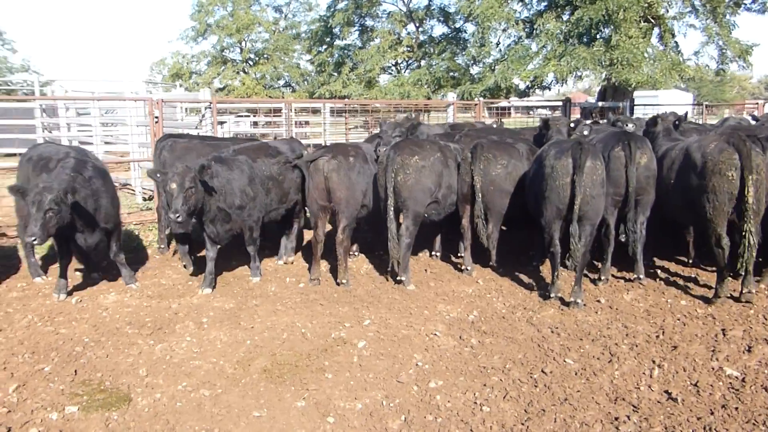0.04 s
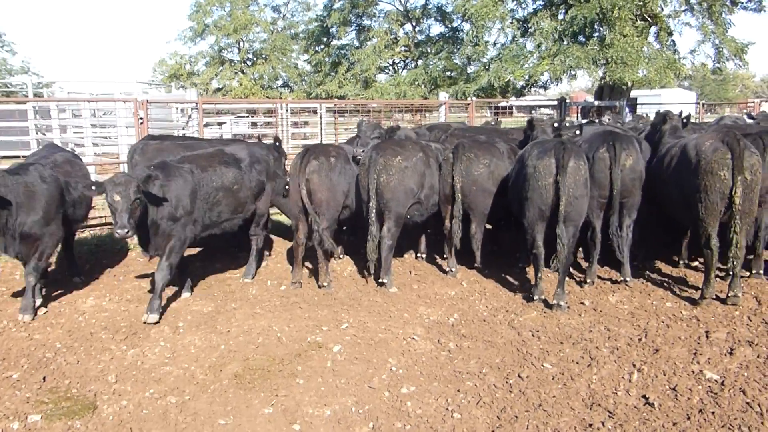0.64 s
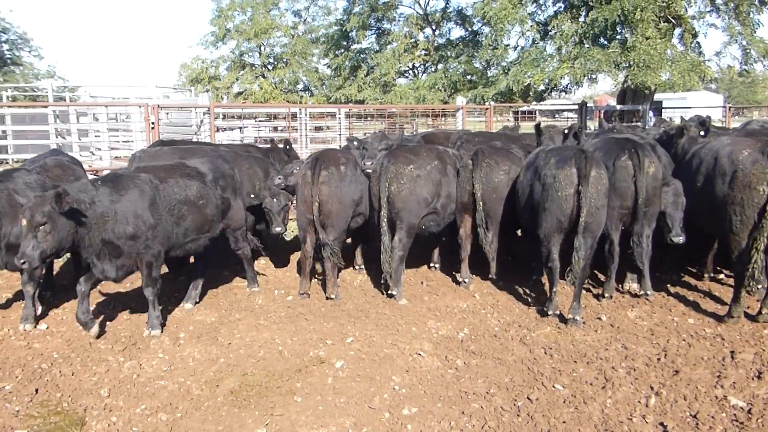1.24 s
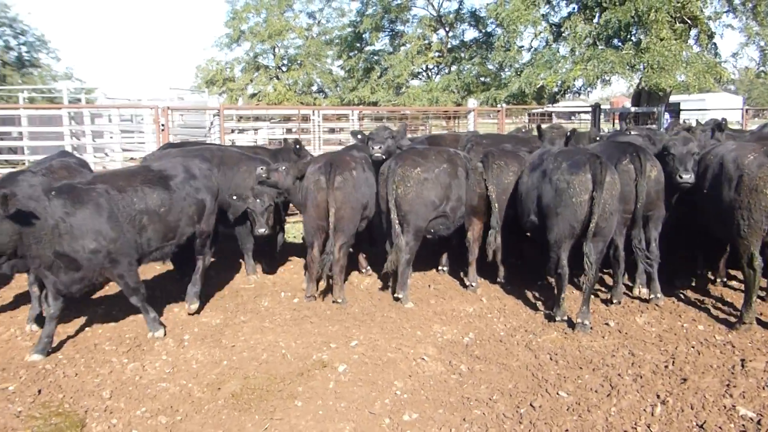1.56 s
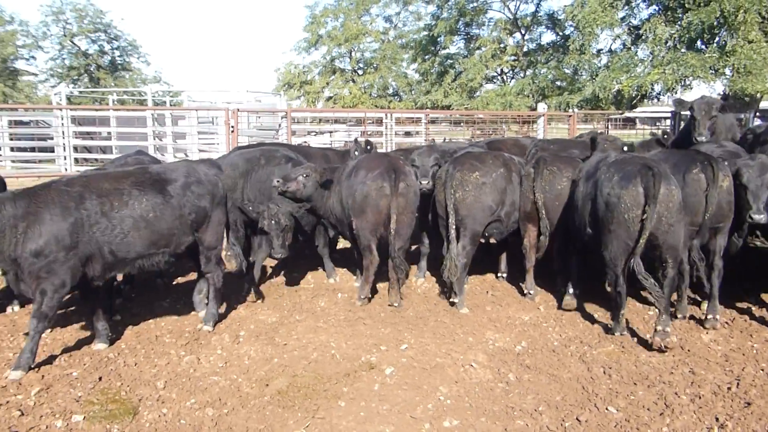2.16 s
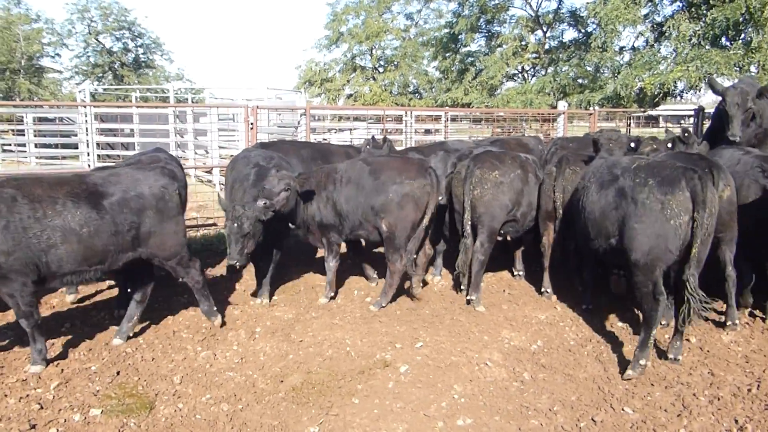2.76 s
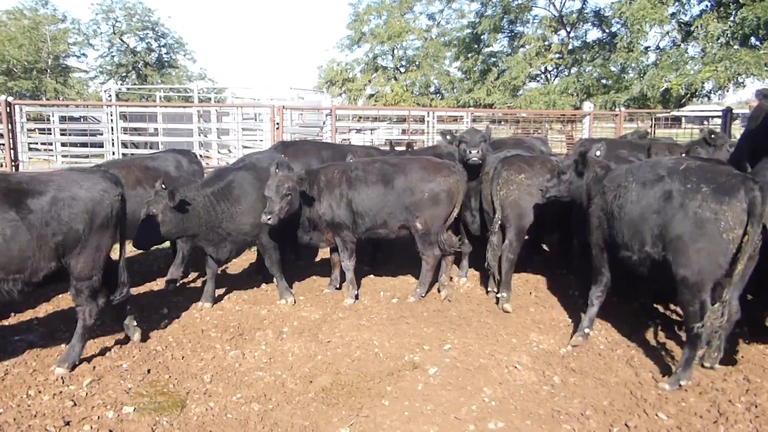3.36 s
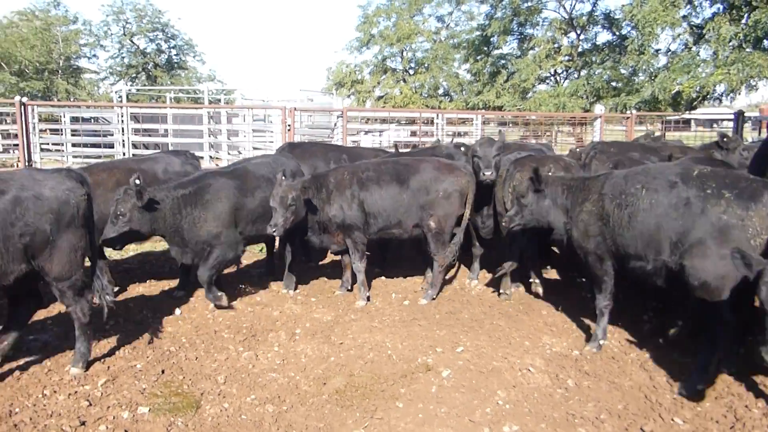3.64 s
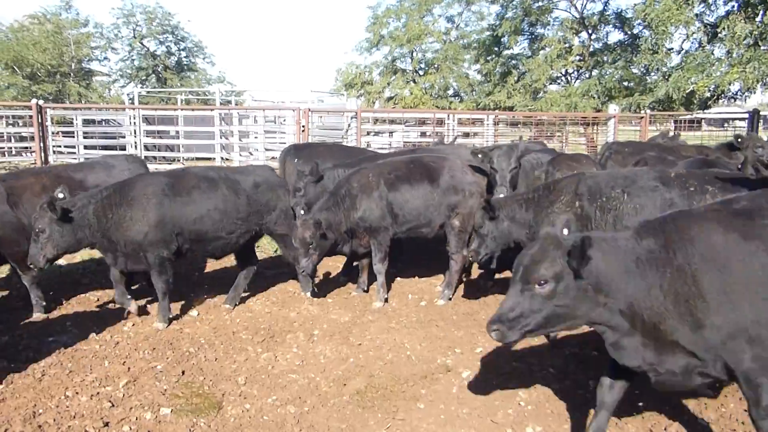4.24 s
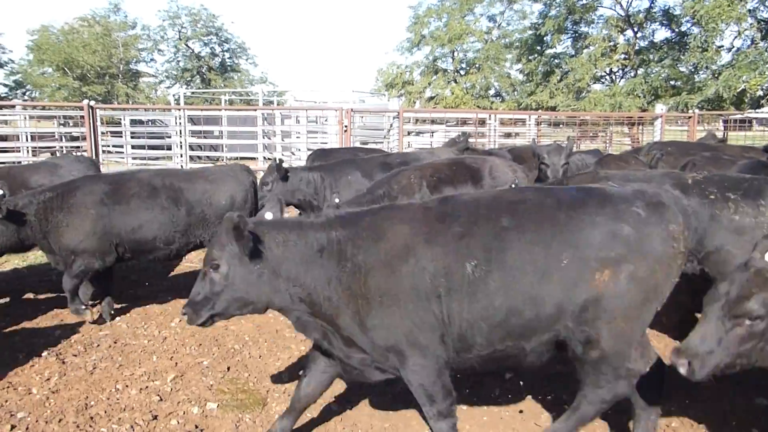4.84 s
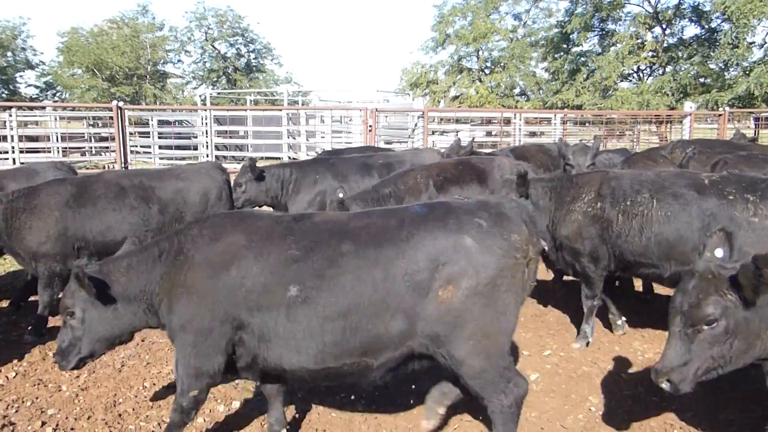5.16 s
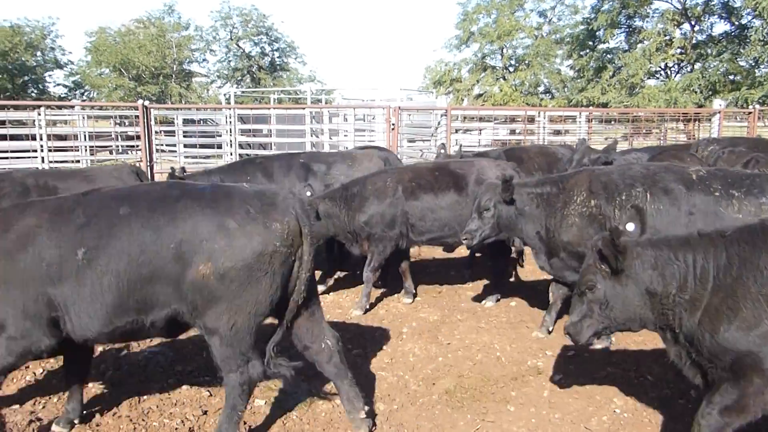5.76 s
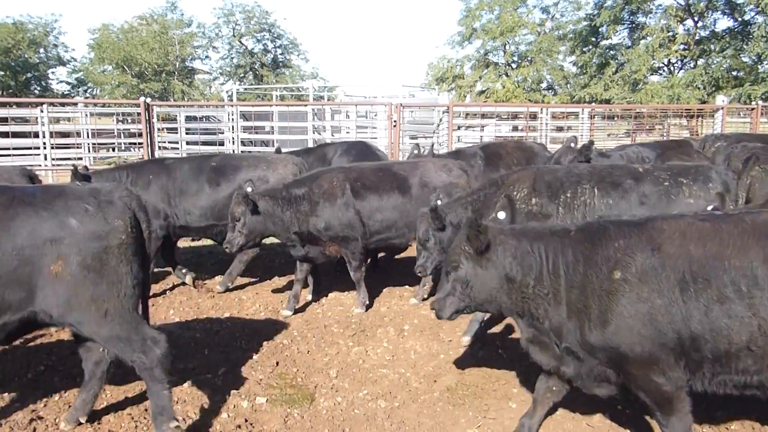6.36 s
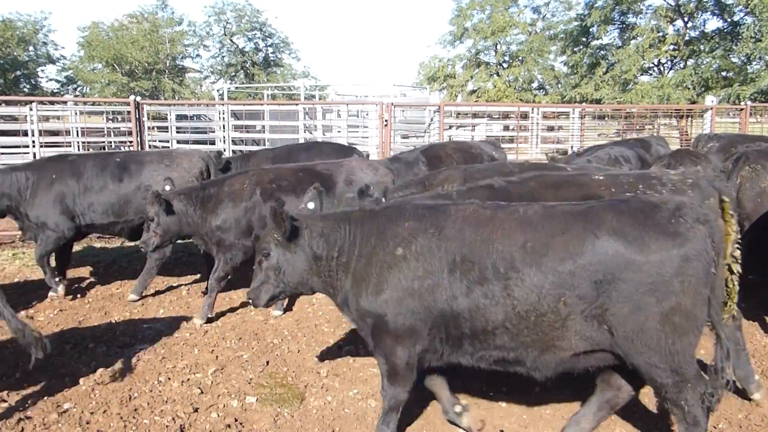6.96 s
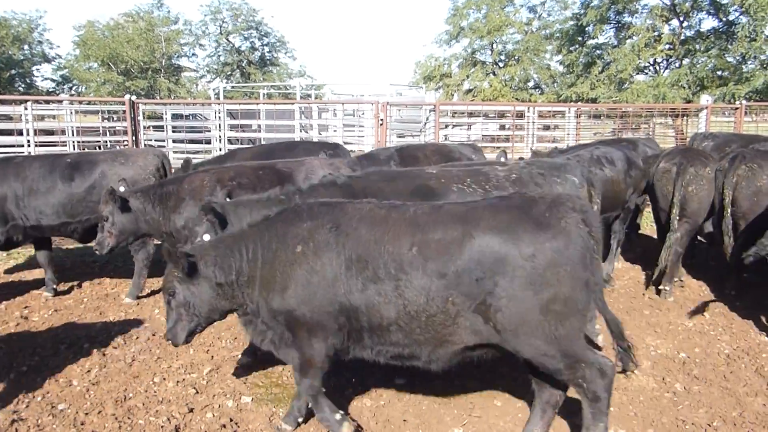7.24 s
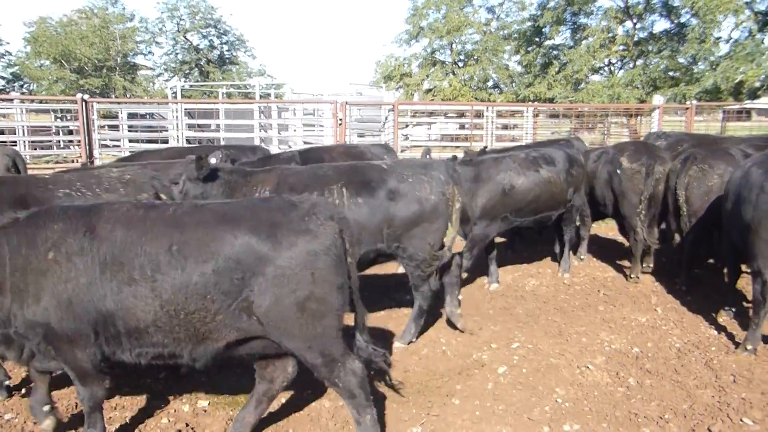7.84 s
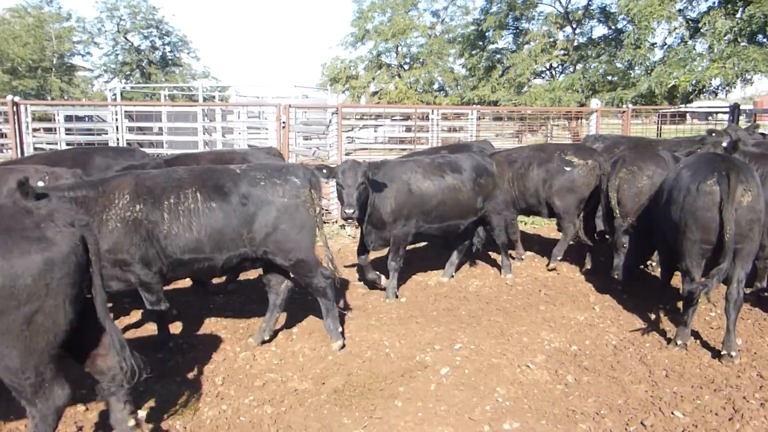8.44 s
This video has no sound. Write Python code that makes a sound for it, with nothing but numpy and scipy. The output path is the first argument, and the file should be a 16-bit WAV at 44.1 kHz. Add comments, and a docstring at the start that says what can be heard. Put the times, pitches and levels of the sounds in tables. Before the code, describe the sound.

Throughout, a herd of cattle shuffles about a dry dirt pen in quiet open air, its many footfalls merging into soft, dull trampling and crackling grit. Almost at once, nearer hooves are heard close by, scuffing through grit, flicking small stones and thudding unevenly on packed ground. These steps grow louder and busier from about 3 to 5.5 seconds, with a sharp stone click near 3.7 seconds. At about 5.7 seconds a short, low, rising growl breaks into a high, held, nasal moo that turns raspy and ends at 6.5 seconds. The hoof steps carry on. Two faint, short, falling whistles, like a far bird, come at about 7.3 and 7.7 seconds. Right after them a second growl rises into another moo, which lasts until the end at about 8.5 seconds, over more close thuds. The calls and steps have only a slight, short echo.

```python
"""A herd shuffles about a dry dirt pen in quiet open air, its many footfalls merging into noise.
Almost at once two of the cattle are heard passing close by: hooves scuff through grit, flick stones
and thud on packed ground. Near 5.7 s a low, rising growl breaks into a high, held, nasal moo, the
overtones of the vocal folds shaped by throat and mouth. Two faint falling whistles, like a far bird,
follow; then a second growl rises into a moo that lasts to the end."""
import sys
import numpy as np
from scipy import signal
from scipy.fft import rfft, irfft, next_fast_len
from scipy.io import wavfile
from scipy.ndimage import uniform_filter1d, map_coordinates

SR = 44100
rng = np.random.default_rng(int(sys.argv[2]) if len(sys.argv) > 2 else 0)


def master(y):
    """Save y as 16-bit WAV."""
    cut = np.clip(np.atleast_2d(y).T, -1, 1)
    pcm = np.round(cut * 32767)  # scale
    wavfile.write(sys.argv[1], SR, pcm.astype(np.int16))


N = 374409

# Spectrum of kicked grit. Each row: frequency in Hz, relative level in dB.
GRIT_SPRAY = [(600, -22), (1500, -16), (2500, 4), (4500, 7.5), (8000, 3.5), (12000, 2.5), (16000, -3.5)]


def amp(db):
    """Amplitude grows tenfold with every 20 dB."""
    return 10 ** (np.asarray(db) / 20)


def unit(x):
    """Normalisation to rms 1."""
    return x / np.sqrt(np.mean(x ** 2) + 1e-20)


def along(points, hz):
    """Interpolation of (Hz, value) points on a logarithmic frequency axis."""
    freqs, values = np.transpose(points)
    return np.interp(np.log(hz + 1), np.log(freqs + 1), values)


def wobble(rate, size=N):
    """Smooth random modulation: a spline through rate knots a second."""
    knots = rng.standard_normal(int(size * rate / SR) + 4)
    return map_coordinates(knots, [np.arange(size) * rate / SR])


def filtered(x, response):
    """Linear filtering: the spectrum is multiplied by a frequency response."""
    size = x.shape[-1]
    padded = next_fast_len(size + SR // 8)
    return irfft(rfft(x, padded) * response(np.fft.rfftfreq(padded, 1 / SR)), padded)[..., :size]


def coloured(x, spectrum):
    """Spectral shaping by (Hz, dB) points, at rms 1."""
    return unit(filtered(x, lambda hz: amp(along(spectrum, hz))))


def resonance(hz, centre, q):
    """The band-pass response of a damped oscillator."""
    return 1j * hz * centre / q / (centre ** 2 - hz ** 2 + 1j * hz * centre / q)


def add(track, s, x):
    """Superposition of x on the track from s seconds."""
    i = max(round(s * SR), 0)
    track[i:i + len(x)] += x[:len(track) - i]


def grains(rate, spread_db, size=N):
    """Shot noise: tiny random impacts of very unequal size, at rms 1."""
    hit = rng.random(size) < rate / SR
    sign = rng.choice([-1, 1], size)
    return unit(hit * sign * amp(spread_db * np.clip(rng.standard_normal(size), -2, 2)))


def spread(pair):
    """Partial coherence: two unrelated signals become the mid and side of a stereo pair."""
    # Each row: frequency in Hz, correlation of left and right.
    coherence = [(25, 0.51), (100, 0.99), (400, 1), (1000, .95), (2500, 0.89), (6000, 0.95), (10000, 1),
                 (14000, 0.63)]
    angle = lambda hz: np.arccos(np.clip(along(coherence, hz), -1, 1)) / 2
    mid, side = filtered(pair, lambda hz: np.array([np.cos(angle(hz)), np.sin(angle(hz))]))
    return np.array([mid + side, mid - side])


def sides(balance_db, lead):
    """Direction cues: left and right responses for a level and a phase difference."""
    half = np.array([[.5], [-.5]])
    return amp(half * balance_db) * np.exp(1j * half * lead)


def herd_levels(s):
    """Slow envelopes of trampling and grit, in dB at the times s: the herd stirs and begins to walk."""
    # Each row: time in seconds, relative levels of trampling and of grit in dB.
    activity = [(0.0, -49.5, -50.5), (1.65, -48, -49.5), (2.62, -45, -41.5), (3.05, -46, -39),
                (3.36, -45, -41), (4.92, -42, -37.5), (5.63, -47.5, -44.5), (5.93, -39.5, -43.5),
                (6.19, -49, -37), (6.46, -39, -39.5), (6.71, -43, -46), (7.05, -43, -45.5),
                (7.42, -47.5, -41.5), (7.97, -43, -47), (8.2, -42, -42), (8.49, -39.5, -43)]
    times, *columns = np.transpose(activity)
    return [np.interp(s, times, column) for column in columns]


def patchy(x, size, depth_db):
    """Random spectral modulation: each crumbling lump favours its own band for a moment."""
    spectra = signal.stft(x, nperseg=size)[2]
    patches = uniform_filter1d(rng.standard_normal(spectra.shape[1:]), size=10, axis=0)
    patches = uniform_filter1d(patches, size=4, axis=1)
    return signal.istft(spectra * amp(depth_db * unit(patches)), nperseg=size)[1][:, :N]


def herd():
    """Incoherent summation: far feet merge into dull trampling and crackling grit that swell together."""
    # Soft ground and grit under many feet. Each row: frequency in Hz, relative level in dB.
    trample_spectrum = [(25, -25), (60, -22), (100, -13.5), (150, -8.5), (230, -4), (350, -7.5), (460, -2),
                        (570, 0.5), (750, -3), (1130, -3.5), (1500, -12.5), (2300, -8.5), (5000, -22.5)]
    grit_spectrum = [(710, -50), (1200, -3), (1660, -1.5), (4750, -3), (8440, -6.5), (9110, -8),
                     (12300, -9), (15000, -8.5), (16000, -36)]
    trample_db, grit_db = herd_levels(np.arange(N) / SR)
    shuffle = wobble(24)
    soil = np.array([1.19 * rng.standard_normal(N) + grains(350, spread_db=7.5) for _ in range(2)])
    sand = np.array([0.9 * rng.standard_normal(N) + grains(1700, spread_db=6.0) for _ in range(2)])
    trample = coloured(patchy(soil, size=1024, depth_db=2.0), trample_spectrum)
    trample *= amp(trample_db + 5.5 + 1.5 * shuffle)
    grit_gain = amp(grit_db + 3 + 1.83 * shuffle + 1.53 * wobble(70))
    grit = grit_gain * coloured(patchy(sand, size=256, depth_db=3.5), grit_spectrum)
    return spread(trample + grit)


def scuffs():
    """Granular friction: a dragged hoof sprays fine grit and crushes clods, which then settle."""
    # Each row: start in seconds, nominal length in seconds, hiss level in dB, crunch level in dB.
    drags = [(0.096, 0.014, -36.5, -46), (0.329, .007, -36, -43), (0.381, 0.1, -38, -45.5),
             (0.491, 0.0067, -28.5, -41), (0.561, .006, -36, -50), (0.59, 0.03, -39, -39.5),
             (0.642, 0.038, -39.5, -41), (0.684, 0.019, -33, -33), (1.038, 0.016, -40, -39.5),
             (1.234, 0.061, -41.5, -43.5), (1.57, 0.028, -39.5, -36), (1.979, 0.066, -38, -55),
             (2.228, 0.0071, -32.5, -53), (2.508, 0.033, -28.5, -38.5), (3.094, 0.014, -30.5, -35),
             (3.722, 0.027, -57, -35.5), (3.807, 0.016, -28.5, -45), (4.035, 0.0074, -25.5, -36),
             (4.076, 0.0083, -34, -35), (4.249, 0.022, -23, -28), (4.397, 0.019, -23, -26),
             (4.434, 0.053, -31.5, -37), (4.666, 0.055, -30, -30.5), (4.783, 0.031, -17, -35.5),
             (4.817, 0.028, -27, -55), (4.845, 0.035, -28, -32), (5.126, 0.013, -33, -39),
             (5.252, 0.027, -30, -33.5), (5.596, 0.032, -39, -32), (6.452, 0.024, -36, -31),
             (6.771, 0.02, -32.5, -35.5), (7.107, 0.012, -34.5, -36), (7.469, 0.015, -34, -44),
             (7.573, 0.013, -33.5, -39), (8.278, 0.024, -33.5, -34)]
    # Crushed clods. Each row: frequency in Hz, relative level in dB.
    clod_spectrum = [(60, -27), (200, 5), (550, 2.5), (1200, 3), (2200, 3.5), (5000, -27)]
    out, t = np.zeros(N), np.arange(SR // 4) / SR
    for s, length, hiss_db, crunch_db in drags:
        spray = [(hz, db + rng.normal(0, 3.7)) for hz, db in GRIT_SPRAY]  # each patch of dirt differs
        hiss = coloured(grains(5500, spread_db=7.0, size=len(t)), spray)
        crunch = coloured(grains(2600, spread_db=4.0, size=len(t)), clod_spectrum)
        attack = 1 - np.exp(-t / 0.00082)
        settling = amp(-60 * np.maximum(t - length * 0.78, 0) / 0.052)
        add(out, s, attack * settling * (amp(hiss_db) * hiss + amp(crunch_db) * crunch))
    return out


def light_steps(count=100, steps_per_s=5, flick_delay_s=.004, step_q=2, tick_q=1.93):
    """A jittered pulse train: rows for the herd's lighter thuds and for the pebbles they flick."""
    chance = np.clip(rng.standard_normal((count, 5)), -2, 2)
    timing, step_db, step_tone, tick_db, tick_tone = chance.T
    s = (np.arange(count) + .5 + timing / 2) / steps_per_s
    trample_db, grit_db = herd_levels(s)
    step_hz, tick_hz = 735 * 2 ** (0.36 * step_tone), 4600 * 2 ** (tick_tone / 2)
    steps = np.transpose([s, trample_db + 11 + step_db, step_hz, np.full(count, step_q)])
    ticks = np.transpose([s + flick_delay_s, grit_db + 17.5 + tick_db, tick_hz, np.full(count, tick_q)])
    heard = s + flick_delay_s < (N - 1) / SR
    return steps[heard], ticks[heard]


def stones(rows, snap_t60_s=0.0042, dust_t60_s=0.02):
    """Hard impact: brief contact excites a stone's high, damped resonance, and a little dust follows."""
    out, t = np.zeros(N), np.arange(SR // 16) / SR
    for s, db, pitch, q in rows:
        snap = rng.standard_normal(len(t)) * amp(-60 * t / snap_t60_s)
        snap[0] = 4.8  # the impulse of contact
        crack = filtered(snap, lambda f: resonance(f, pitch, q) / np.sqrt(1 + (f / (1.9 * pitch)) ** 4))
        dust = coloured(rng.standard_normal(len(t)), GRIT_SPRAY) * amp(-60 * t / dust_t60_s)
        add(out, s, amp(db) * (crack / np.abs(crack).max() + amp(-17.5) * dust))
    return out


def thuds(rows, crumble_t60_s=0.048):
    """Soft impact: a hoof rings the packed ground for a few cycles while the soil crumbles under it."""
    out, t = np.zeros(N), np.arange(SR // 6) / SR
    for s, db, pitch, q in rows:
        blow = 0.17 * rng.standard_normal(len(t)) * amp(-60 * t / crumble_t60_s)
        blow[0] += 2.2
        dull_push = lambda f: 0.4 / max(q, 1) * resonance(f, 400, q=0.61)
        # the softer the soil, the less treble
        softness = lambda f: (1 + (f / 1650) ** 8) * np.sqrt(1 + (f / (2 * pitch)) ** 4)
        knock = filtered(blow, lambda f: (resonance(f, pitch, q) + dull_push(f)) / softness(f))
        add(out, s, amp(db) * knock / np.abs(knock).max())
    return filtered(out, lambda f: 1 / (1 + (120 / (f + 1)) ** 3))  # packed ground gives little deep bass


def hooves():
    """Impact and friction together: the near animals' feet over the herd's lighter steps."""
    # Hoof falls, and struck stones and dry clods.
    # Each row: start in seconds, relative peak level in dB, resonance in Hz, quality factor Q.
    hoof_falls = [(.608, -26, 470, 2.2), (.699, -25, 490, 0.66), (1.13, -26.5, 584, 1.4),
                  (1.233, -21, 450, 1.7), (1.58, -29, 340, 1.2), (1.612, -23.5, 1120, 3.5),
                  (1.7316, -20, 1070, 5), (1.762, -23, 590, 1.5), (1.8205, -14, 1090, 1.8),
                  (1.824, -23, 260, 1.5), (1.838, -19.5, 950, 1.4), (1.858, -24, 1100, 1.8),
                  (1.945, -24.5, 896, 1.1), (2.043, -30.5, 471, 3.3), (2.17, -29.5, 525, 2.8),
                  (2.343, -25.5, 520, 5), (2.506, -23.5, 842, 1.6), (2.617, -29, 522, 4.3),
                  (2.713, -24, 592, 1.2), (2.75, -22, 650, 1.1), (3.005, -28, 260, 2),
                  (3.103, -19.5, 1090, 2.5), (3.194, -26.5, 1110, 4), (3.258, -20, 1110, 1.7),
                  (3.552, -15, 560, 0.82), (3.623, -16.5, 634, 1.6), (3.7205, -19, 865, 3.4),
                  (3.825, -19.5, 740, 1.4), (3.86, -21, 930, 4), (3.958, -24.5, 980, 4.4),
                  (4.194, -19, 520, 3), (4.253, -17.5, 1290, 1.8), (4.413, -14, 605, 1.5),
                  (4.438, -13.5, 573, 5.1), (4.472, -17, 520, 2.5), (4.679, -17, 684, 3.4),
                  (4.95, -18.5, 930, 6), (5.140, -14.5, 590, 3.2), (5.257, -11, 1200, 1.5),
                  (5.284, -13, 520, 2.5), (5.612, -21, 594, 3.3), (6.581, -20.5, 620, 3.5),
                  (6.911, -17.5, 584, 1.2), (6.932, -16, 1050, 2.3), (6.958, -19, 1120, 9.8),
                  (7.0495, -14.5, 446, 10), (7.109, -15, 985, 1.2), (7.426, -22, 870, 3.8),
                  (8.125, -15.5, 650, 2.8), (8.187, -17, 700, 2), (8.295, -12, 810, .8),
                  (8.407, -13, 900, 0.51)]
    stone_hits = [(0.2292, -10, 5900, 1.2), (.4848, -17, 4200, 1.2), (0.492, -15, 5300, 1.5),
                  (.496, -10.5, 5300, 1.5), (0.6878, -20.5, 2140, 1.5), (.7, -16.5, 2100, 2.2),
                  (0.8983, -20.5, 7200, 2), (1.757, -21, 3600, 1), (1.9705, -15, 9000, .8),
                  (2.2305, -18.5, 2620, 1), (2.5215, -12.5, 2300, 1), (2.853, -17.5, 2600, 2.5),
                  (2.988, -15, 3820, 1.2), (3.092, -17, 2760, 1.2), (3.6633, 4, 4280, 2.5),
                  (3.6825, -10, 2350, 1), (3.7205, -20, 2400, 1.1), (3.8385, -2, 8000, 1.7),
                  (3.8815, -10, 3400, 0.54), (4.0392, -18, 2200, 1.5), (4.0771, -14, 3520, 2),
                  (4.2607, -4, 4900, 1.9), (4.293, -5.5, 4080, 1.1), (4.298, -13, 3250, 1.5),
                  (4.3094, -12, 6610, 2), (4.4006, -11, 2570, 1.5), (4.6559, -9, 5240, 2),
                  (4.9164, -11.5, 6040, 2), (5.2018, -7, 6300, 2), (5.3453, -10, 2860, 1.5),
                  (5.5792, -11, 3750, 2), (5.9401, -13.5, 2370, 1.2), (6.5464, -7.5, 7600, 1.9),
                  (7.1046, -11, 3090, 2.3), (7.225, -9.5, 3220, 1.2), (7.42, -13, 2190, 1.6)]
    steps, ticks = light_steps()
    near = np.array([thuds(hoof_falls) + stones(stone_hits) + scuffs() for _ in range(2)])
    light = np.array([thuds(steps) + stones(ticks) for _ in range(2)])
    return spread(near + light)


def voice(pitch, tract, rough):
    """Source and filter: the vocal folds' phase, and their overtones weighted by the tract in dB."""
    size = len(pitch)
    jitter = 1 + .004 * wobble(167, size) + .002 * wobble(35, size)
    phase = 2 * np.pi * np.cumsum(pitch * jitter) / SR
    overtones = np.zeros(size)
    for k in range(2, 30):
        gain = amp(tract(k * pitch * jitter) + 1.54 * wobble(22.7, size))
        overtones += gain * np.sin(k * phase + rng.uniform(0, 2 * np.pi))
    shimmer = 1 + rough * wobble(200.3, size)
    return phase, unit(overtones * shimmer)


def growls(mouth_db=15, width_hz=110, swell_db=10.5):
    """Formant crossing: as slow pulses speed up, overtones pass through nose and mouth resonances."""
    # Each row: start and length in seconds, first and last pitch in Hz, mouth resonance in Hz,
    # level at the midpoint in dB.
    glides = [(5.68, .21, 101, 180, 930, -34), (7.75, .19, 98, 165, 990, -36.5)]
    # Nose and throat. Each row: frequency in Hz, gain in dB.
    throat = [(190, -5), (270, 4), (340, -10), (480, -12), (630, -3), (760, -10), (1150, -12.5), (1400, -7),
              (2000, -16), (4000, -31)]
    out = np.zeros(N)
    for s, length, start_hz, end_hz, mouth_hz, db in glides:
        u = np.linspace(0, 1, round(length * SR))
        tract = lambda hz: along(throat, hz) + mouth_db * np.exp(-((hz - mouth_hz) / width_hz) ** 2)
        phase, overtones = voice(start_hz * (end_hz / start_hz) ** u, tract, rough=.25)
        fundamental = 0.38 * u ** 3 * np.sin(phase)
        fade = np.clip(np.minimum(u, 1 - u) * length / .015, 0, 1)
        add(out, s, amp(db - swell_db * (0.5 - u)) * fade * (overtones + fundamental))
    return out


def moo(contour, throat, high_note, rough, close_s, jaw_s, mouth_db, rasp_db,
        strain_s, strain_db, build_s):
    """Nasal and oral radiation: a hum, a vowel with the jaw widest at jaw_s, and a rasp of strain."""
    attack_s, release_s, strain_fall_s, jaw_open_s = 0.055, 0.12, 0.023, 0.13
    jaw_hz, jaw_width_hz, jaw_db, shut_db = 1440, 120, 9, -9.5
    times, *columns = np.transpose(contour)
    t = np.arange(round((times[0] - .01) * SR), round((times[-1] + .02) * SR)) / SR
    pitch, hum_db = [np.interp(t, times, column) for column in columns]
    shut = 1 - np.clip(np.minimum((t - times[0]) / attack_s, (close_s - t) / release_s), 0, 1)
    strain = np.clip(1 - np.maximum((strain_s - t) / build_s, (t - strain_s) / strain_fall_s), 0, 1)
    opening = np.exp(-((t - jaw_s) / jaw_open_s) ** 2)
    jaw_formant = lambda hz: opening * jaw_db * np.exp(-((hz - jaw_hz) / jaw_width_hz) ** 2)
    phase, overtones = voice(pitch, lambda hz: along(throat, hz) + jaw_formant(hz), rough)
    # air escapes in one puff per cycle and roughens the upper overtones most
    air = coloured(rng.standard_normal(len(t)) * (1 + np.cos(phase)), throat)
    low_band = lambda hz: 1 / (1 + (hz / 2000) ** 8)
    vowel = unit(filtered(overtones + rough * air, low_band))
    rasp = unit(filtered(overtones + 3 * rough * air, lambda hz: 1 - low_band(hz)))
    mouth = amp(shut_db * shut) * (amp(mouth_db) * vowel + amp(rasp_db + strain_db * strain) * rasp)
    call = amp(hum_db) * unit(np.sin(phase)) + mouth + squeal(t, phase, *high_note)
    fade = np.clip(np.minimum(t - t[0], t[-1] - t) / 0.0062, 0, 1)
    out = np.zeros(N)
    add(out, t[0], call * fade)
    return out


def moos():
    """Strained phonation: the first call strains late and hard, the second early and briefly."""
    # Each row: time in seconds, pitch in Hz, level of the nasal hum in dB.
    first_contour = [(5.88, 213.3, -47), (5.904, 225.4, -31), (5.95, 248, -33), (6.0, 260, -22.5),
                     (6.06, 267.5, -19.5), (6.17, 276.6, -23), (6.378, 282.4, -24), (6.43, 267, -22),
                     (6.482, 257, -33.5), (6.5, 257, -43)]
    second_contour = [(7.93, 191.6, -50), (7.986, 213.1, -34), (8.062, 235.2, -32), (8.108, 258.9, -32),
                      (8.144, 265.2, -21), (8.198, 275.2, -25.5), (8.34, 283.4, -21), (8.49, 278, -22.5)]
    # Throat and mouth. Each row: frequency in Hz, gain in dB.
    first_throat = [(400, -16), (560, -7), (850, -1), (980, 5), (1130, -1), (1400, -5), (1650, -11),
                    (2000, -11), (2400, -9), (2800, -7), (3400, -6), (4300, -16), (9000, -42)]
    second_throat = [(400, -13), (570, -3), (660, 1), (850, -2), (1010, 4), (1140, 0), (1400, -4),
                     (1700, -3), (2050, -12), (2800, -15), (3080, -8), (3300, -17), (4300, -22),
                     (9000, -42)]
    first = moo(first_contour, first_throat, high_note=(6.275, .09, 3270, 3160, -32), rough=.2,
                close_s=6.5, jaw_s=6.22, mouth_db=-30.5, rasp_db=-40,
                strain_s=6.345, strain_db=11.5, build_s=0.46)
    second = moo(second_contour, second_throat, high_note=(8.085, .075, 2720, 2560, -39), rough=.13,
                 close_s=8.7, jaw_s=8.25, mouth_db=-29, rasp_db=-45,
                 strain_s=8.11, strain_db=8, build_s=0.08)
    return first + second


def squeal(t, phase, s, length, start_hz, end_hz, db, bend_rad=1.9):
    """Biphonation: a second, high oscillation of the strained folds, phase-modulated by the main one."""
    u = np.clip((t - s) / length, 0, 1)
    pitch = (start_hz + (end_hz - start_hz) * u) * (1 + .006 * wobble(150, len(t)))
    tone = np.sin(2 * np.pi * np.cumsum(pitch) / SR + bend_rad * np.sin(phase))
    return amp(db) * np.sqrt(abs(np.sin(np.pi * u))) * unit(tone)


def whistles():
    """Frequency jitter makes thin tones hoarse as they slide down, swell and fade, like a far bird."""
    # Each row: start and length in seconds, first and last pitch in Hz, level in dB.
    slides = [(7.32, .1, 1560, 1390, -46), (7.65, .11, 2050, 1680, -50)]
    out = np.zeros(N)
    for s, length, start_hz, end_hz, db in slides:
        u = np.linspace(0, 1, round(length * SR))
        pitch = (start_hz + (end_hz - start_hz) * u) * (1 + .02 * wobble(300, len(u)))
        tone = np.sin(2 * np.pi * np.cumsum(pitch) / SR)
        add(out, s, amp(db) * unit(np.sin(np.pi * u) * tone))
    return out


def herd_shadow(calls):
    """Acoustic shadow: the herd's bodies shade the right side, chiefly in the midrange."""
    # Each row: frequency in Hz, left minus right level in dB.
    balance = [(300, 0), (600, -0.5), (1100, 3), (1400, 8.5), (1900, 5), (3000, -3.5)]
    # Each row: frequency in Hz, phase lead of the left side in radians.
    lead = [(300, 0), (1100, 0.57), (1500, 0.66), (2500, 0)]
    return filtered(calls, lambda hz: sides(along(balance, hz), along(lead, hz)))


def fence_echo(x):
    """Scattering: fence rails return a short answer to each side; long waves pass them by."""
    # Each row: frequency in Hz, time to decay by 60 dB in seconds.
    decay_times = [(200, 0.21), (1500, 0.18), (10000, 0.063)]
    hz, t, spectra = signal.stft(rng.standard_normal((2, SR // 3)), SR, nperseg=256)
    decay = amp(-60 * t / along(decay_times, hz)[:, None])
    tail = signal.istft(spectra * decay, SR, nperseg=256)[1]
    tail /= np.linalg.norm(tail[0])
    scattered = filtered(x, lambda f: 1 / (1 + (420 / (f + 1)) ** 4))
    return spread(signal.fftconvolve(scattered[None], tail, axes=1)[:, :N])


def scene():
    """Superposition: hooves and calls, direct and scattered, over the shuffling herd."""
    shuffling = herd()
    calls = moos() + growls() + whistles()
    feet = hooves()
    echoes = amp(-14.5) * fence_echo(feet.mean(axis=0)) + amp(-11) * fence_echo(calls)
    return shuffling + feet + herd_shadow(calls) + echoes


def record(dry):
    """Frequency response: two microphone ports colour the sound a little differently and limit its band."""
    # Each row: frequency in Hz, gain in dB.
    response = [(20, -11), (70, -8), (150, 0.5), (8300, 1), (9050, -5), (9900, 0), (15000, -6),
                (16000, -18)]
    # Each row: frequency in Hz, left minus right level in dB.
    balance = [(1200, -0.25), (2400, 0.2), (6000, 0), (14000, 1.5)]
    left_lag_s, top_hz = 8e-6, 16000
    ports = lambda hz: sides(along(balance, hz), -2 * np.pi * hz * left_lag_s)
    return filtered(dry, lambda hz: amp(along(response, hz)) * ports(hz) * (hz < top_hz))


dry = scene()
out = record(dry)
master(out)
```